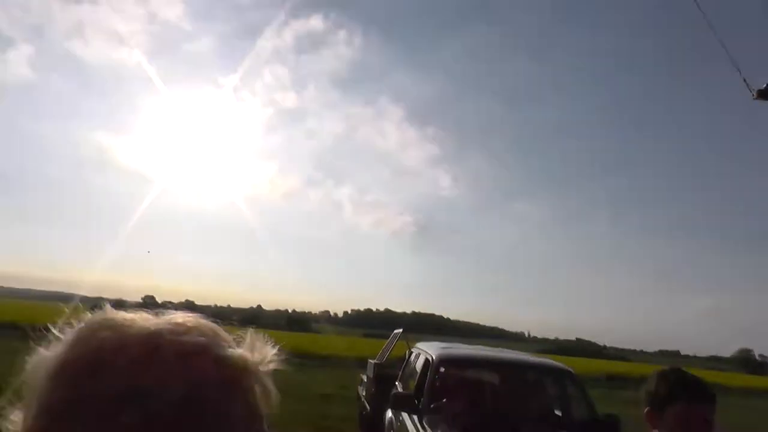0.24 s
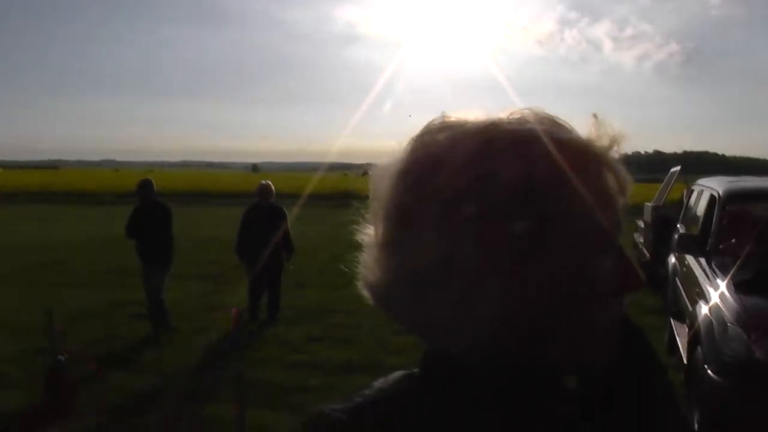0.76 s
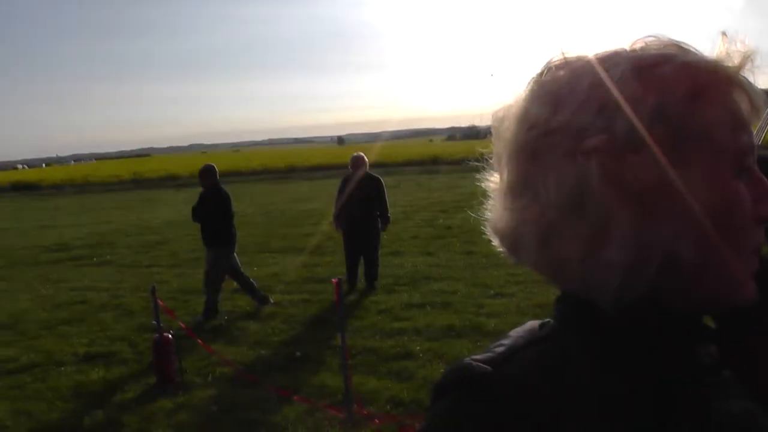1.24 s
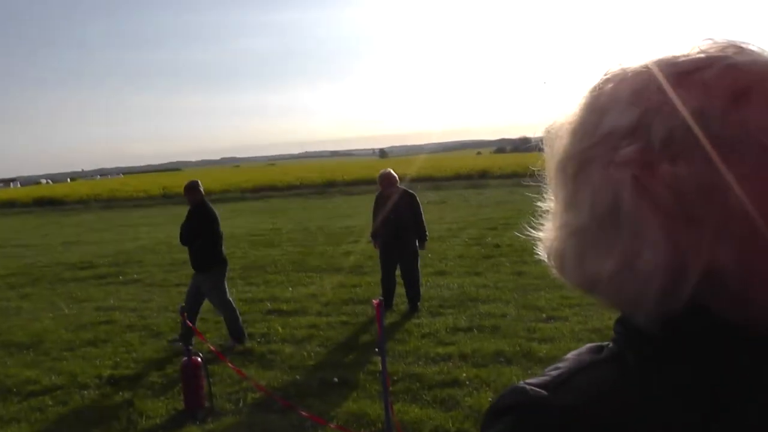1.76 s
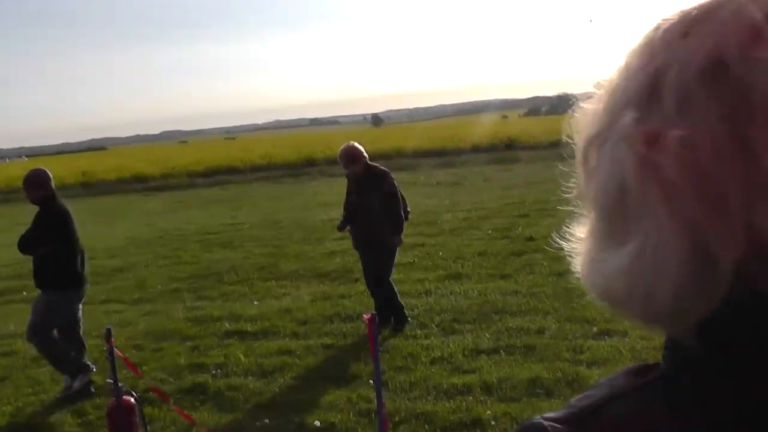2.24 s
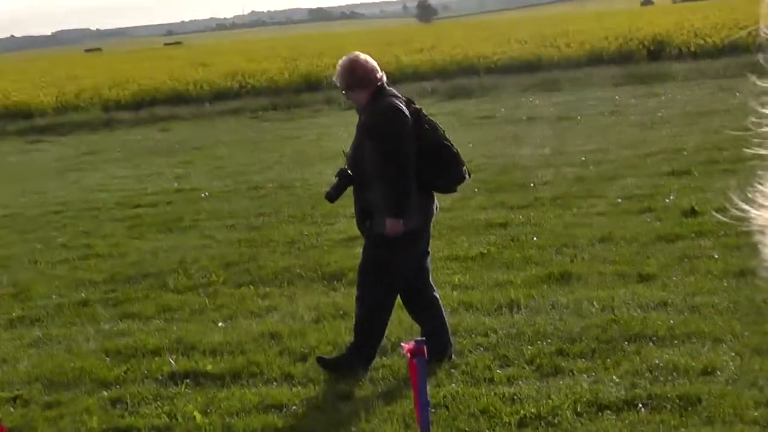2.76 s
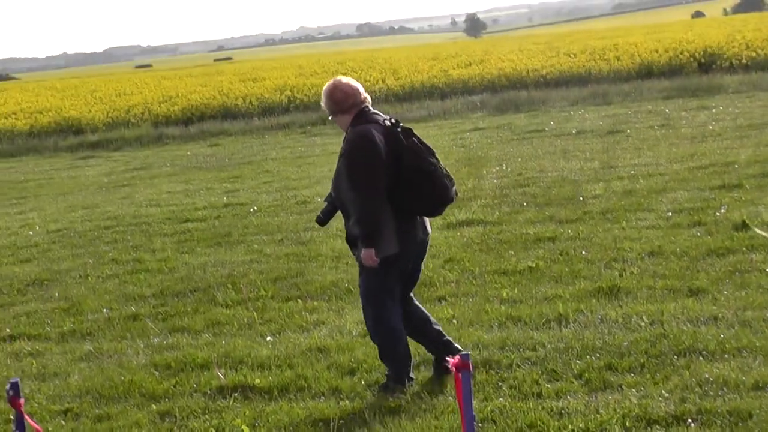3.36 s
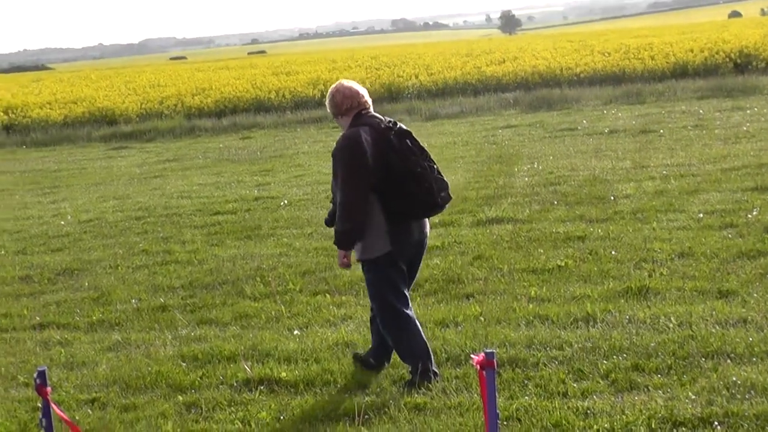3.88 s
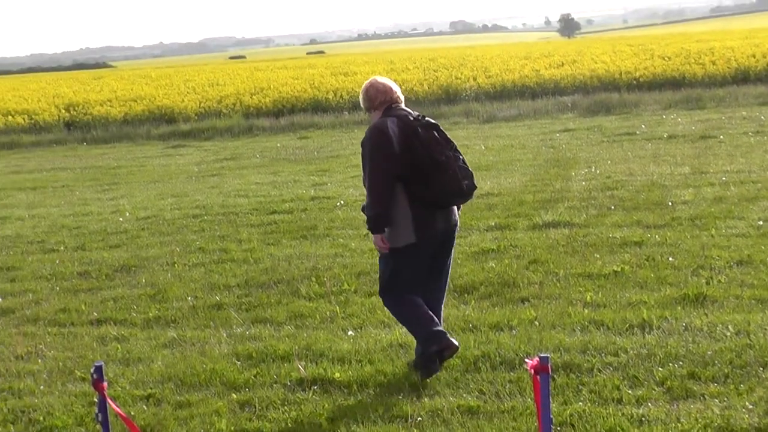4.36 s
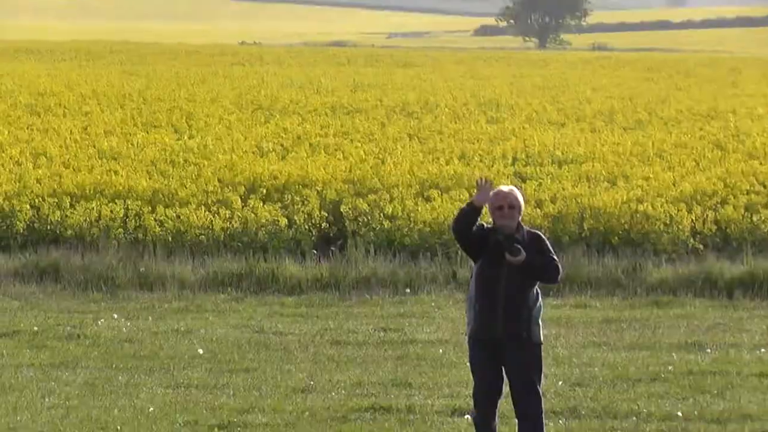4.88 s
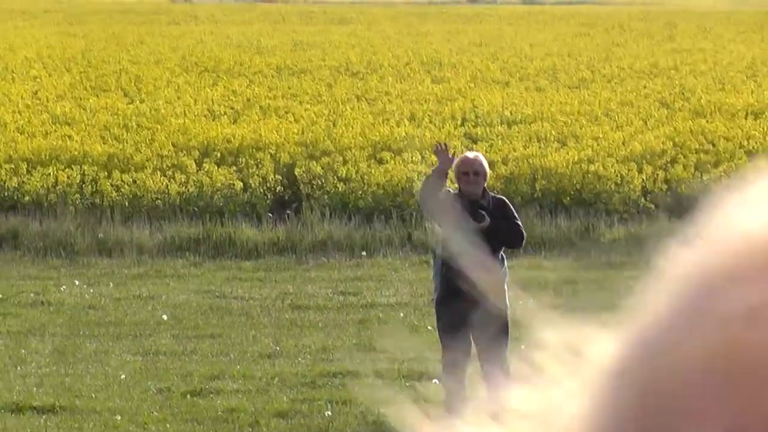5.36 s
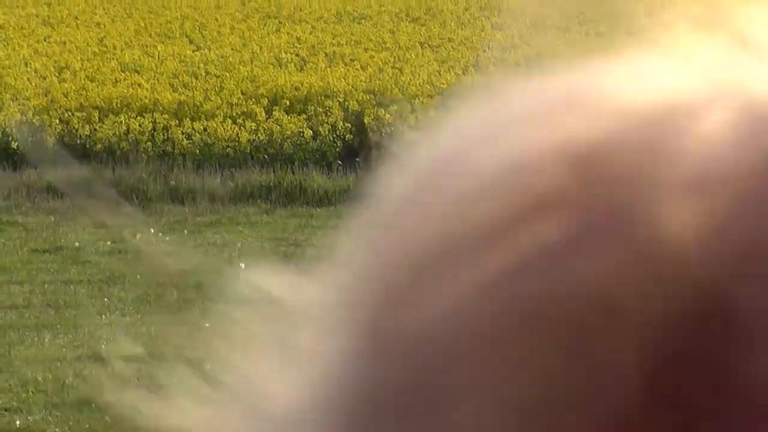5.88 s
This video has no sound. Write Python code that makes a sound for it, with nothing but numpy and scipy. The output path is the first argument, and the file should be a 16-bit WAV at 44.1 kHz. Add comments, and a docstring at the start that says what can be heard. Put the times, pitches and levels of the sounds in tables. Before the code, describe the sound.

A continuous loud burner flame, heard through close stereo microphones in the open air, fills nearly everything. Low turbulent roar and airy gas hiss pulse together, their colour shifting with short echoes as the microphones swing down past heads. After a split-second dip it sounds darker and rougher, weakens, then dies within a moment. Very quiet field rush follows, with a tiny click and a thin high tone.

```python
"""A hot-air balloon's burner roars in an open field, under the surging hiss of its propane jets.
Roar and hiss are shaped noise, coloured by short echoes that shift as the microphones swing down.
The level dips briefly, and the blast goes on as heard from a more shaded spot.
Then the valve shuts and the flame dies; a faint metal tone (a wavering sine) and a click (noise plus
ringing sines) can be heard over a soft rush of noise in the field."""
import sys
import numpy as np
from scipy import signal
from scipy.fft import rfft, irfft
from scipy.io import wavfile
from scipy.ndimage import uniform_filter1d

SR = 44100
rng = np.random.default_rng(int(sys.argv[2]) if len(sys.argv) > 2 else 0)


def waveform_to_disk(signal):
    """Save audio, clipped to [-1, 1], as 16-bit WAV at the path in sys.argv[1]."""
    frames = np.transpose(np.atleast_2d(signal))
    scaled = np.clip(frames, -1, 1) * 32767
    samples = np.round(scaled).astype(np.int16)
    wavfile.write(sys.argv[1], SR, samples)


N = 269441  # length in samples
FRAME, HOP = 2048, 512  # samples in one short-time spectrum, and from one to the next
TIME = np.arange(N) / SR
FRAME_TIME = np.arange(N // HOP + 5)[:, None] * HOP / SR
BIN_HZ = np.fft.rfftfreq(FRAME, 1 / SR)
TOP_HZ = 15800  # upper limit of the whole sound

# the valve shuts, with a rounded start to the fall
SHUT_S, CLOSING_S = 5.664, 0.021

# colour of the roar in the open and from the shaded spot; only the shape counts: f/Hz, level/dB per Hz
ROAR_OPEN_COLOUR = [(21, -56), (60, -20.5), (90, -5.5), (170, 0.5), (243, 0), (285, -5.5), (335, -2),
                    (385, -7.5), (450, -3.5), (580, -5.5), (720, -13), (880, -15), (1000, -17),
                    (1350, -28.5), (2400, -42)]
ROAR_SHADED_COLOUR = [(12, -76), (20, -44), (47, -26), (81, -16.5), (119, -7), (224, -3), (260, -4),
                      (320, -3), (384, -9), (520, -7), (684, -12.5), (808, -20.5), (1190, -27.5),
                      (1340, -31), (1560, -44), (2210, -62), (3740, -120)]
# size of the flame, before the short level changes and its dying away: t/s, level/dB
FLAME_SIZE = [(0, -15), (1.8, -14.5), (3.0, -14.5), (4.8, -14), (4.9, -14.5), (5.35, -14.5), (5.6, -16.5)]
# short rises and falls in the roar's level: t/s, level/dB (rise or fall)
ROAR_LEVEL_CHANGES = [(0.06, -1), (0.31, -0.8), (0.58, -1), (0.73, 1.5), (0.85, 2), (1.06, -1.3),
                      (1.71, 0.5), (1.89, -0.5), (2.5, 1.2), (2.8, -2.5), (3.23, 1), (3.98, 2),
                      (4.15, -2.5), (4.25, 1.5), (4.37, 1.7), (4.54, -3), (4.69, 2), (4.88, -3.3),
                      (4.98, -1.5), (5.1, -2)]
CHANGE_WIDTH_S = 0.022
# the roar's upper range grows and shrinks against its bass: t/s, tilt/dB per octave
ROAR_TILT = [(0, -0.5), (.6, -0.9), (1.1, -0.24), (3.5, 0.5), (4.8, -0.3), (5.6, -.7)]
# a narrow band of the roar stands out, then sinks, as its pitch shifts: t/s, f/Hz (centre), level/dB (lift)
NARROW_BAND = [(0.05, 726, 2), (.35, 730, 9.5), (.6, 730, 3), (.8, 840, 1), (1.3, 850, 1.5), (2.1, 830, -2),
               (2.35, 1040, 4), (2.9, 1030, 1.5), (3.5, 1076, 4), (4, 1070, -7)]
NARROW_WIDTH_HZ = 27
# a broader band below it stands out too, as its pitch shifts: t/s, f/Hz (centre), level/dB (lift)
BROAD_BAND = [(0, 406, 3), (.7, 445, 2.5), (1.2, 620, 3), (1.7, 630, 3), (2.2, 560, -1)]
BROAD_WIDTH_HZ = 53
# the roar's level also drifts a little at random
DRIFT_DB, DRIFT_HZ = 0.1, 5.2
# after the valve shuts the flame dies away, and loses its small eddies first
FLAME_FALL_DB_PER_S, DULLING_OCTAVES_PER_S = 190, 13


def roar(colour, sputter_db, sputter_hz, top_hz=2600):
    """Eddies of burning gas swell and collapse, too large to make treble; uneven mixing makes them sputter."""
    closed_s = since(FRAME_TIME, SHUT_S, CLOSING_S)
    edge_hz = top_hz * 2 ** (-DULLING_OCTAVES_PER_S * closed_s)
    roll_off_db = 10 * np.log10(1 + (BIN_HZ / edge_hz) ** 8)

    octaves = np.log2(np.clip(BIN_HZ, 100, 1500) / 300)  # the tilt turns around 300 Hz
    tilt_db = at(ROAR_TILT, FRAME_TIME) * octaves
    narrow_db = moving_band(NARROW_BAND, NARROW_WIDTH_HZ)
    broad_db = moving_band(BROAD_BAND, BROAD_WIDTH_HZ)
    colour_db = over_bins(colour) + tilt_db + narrow_db + broad_db + lumps() - roll_off_db
    eddies = turbulence(colour_db)

    changes_db = sum(rise_db * bump(TIME, s, CHANGE_WIDTH_S) for s, rise_db in ROAR_LEVEL_CHANGES)
    dying_db = FLAME_FALL_DB_PER_S * since(TIME, SHUT_S, CLOSING_S)
    size_db = at(FLAME_SIZE, TIME) + changes_db - dying_db
    drift_db = DRIFT_DB * wander(DRIFT_HZ)
    return eddies * gain_of(size_db + drift_db + sputter_db * wander(sputter_hz))


def moving_band(rows, width_hz):
    """A band of shifting pitch stands out of the roar, or sinks into it where the lift is negative."""
    lift_db = at(rows, FRAME_TIME, column=2)
    return lift_db * bump(BIN_HZ, at(rows, FRAME_TIME), width_hz)


def lumps(lump_db=1.0, below_hz=700):
    """Large eddies come and go, each lifting its own patch of the low roar."""
    field = rng.standard_normal((len(FRAME_TIME), len(BIN_HZ)))
    field = uniform_filter1d(field, size=9, axis=0)  # each patch lasts a few frames
    field = uniform_filter1d(field, size=6, axis=1)  # and covers a few bins
    return lump_db * evened(field) / (1 + (BIN_HZ / below_hz) ** 4)


# colour of the hiss in the open and from the shaded spot; only the shape counts: f/Hz, level/dB per Hz
HISS_OPEN_COLOUR = [(1000, -0.5), (1600, -3.5), (2100, -3), (2700, -5), (3400, -7), (4200, -6), (4700, -8),
                    (5300, -6), (5900, -2.5), (6900, -2.5), (7900, -6.5), (11300, -5.5), (13000, -10.5),
                    (15700, -19.5)]
HISS_SHADED_COLOUR = [(850, -25), (1450, -2.5), (2080, -5.5), (2560, -11), (3600, -13), (4350, -15.5),
                      (5100, -11), (5870, -9), (6960, -9), (7850, -16), (9680, -9.5), (11200, -8.3),
                      (15000, -19), (15800, -24)]
# the jets surge unevenly, about three times a second: t/s (crest), level/dB (rise)
JET_SURGES = [(.06, 4.5), (.36, 3.5), (.66, 3), (1.07, 4.5), (1.39, 3), (1.73, 3.5), (2.14, 3.5), (2.44, 3),
              (2.84, 4.0), (3.18, 4), (3.52, 4), (3.85, 3.5), (4.25, 3), (4.6, 3)]
SURGE_WIDTH_S = 0.13
# the gas pressure also trembles at random
UNREST_DB, UNREST_HZ = 0.68, 17
# the hiss is strongest at about 4 s and a little weaker on either side
STRONGEST_S, WEAKENING_DB_PER_S = 4.1, 0.26
# the valve is eased back: the hiss sinks and its top softens (softening as it is at TOP_HZ)
EASE_S, EASE_DB_PER_S, SOFTEN_DB_PER_S = 5.17, 8.5, 26.5
# once the valve shuts, the hiss falls this much faster still
HISS_FALL_DB_PER_S = 172
# the top of the hiss is brighter while the microphones still point up: lift, lower edge, how long
UPWARD_DB, UPWARD_HZ, UPWARD_S = 2, 9800, 1
# the hiss has a sharper edge for a while beside a head: centre, width, lift, time, half-length
SHEEN_HZ, SHEEN_WIDTH_HZ, SHEEN_DB, SHEEN_S, SHEEN_LENGTH_S = 5800, 620, 2.5, 1.5, 0.87


def hiss(colour, level_db, flutter_db, flutter_hz):
    """Propane tears out of the nozzles, fluttering quickly on top of its slow surges."""
    upper_range = BIN_HZ ** 8 / (BIN_HZ ** 8 + UPWARD_HZ ** 8)
    lift_db = UPWARD_DB * bump(FRAME_TIME, 0, UPWARD_S) * upper_range
    sheen_now_db = SHEEN_DB * bump(FRAME_TIME, SHEEN_S, SHEEN_LENGTH_S)
    sheen_db = sheen_now_db * bump(BIN_HZ, SHEEN_HZ, SHEEN_WIDTH_HZ)
    eased_s = since(FRAME_TIME, EASE_S, CLOSING_S)
    softening_db = SOFTEN_DB_PER_S * eased_s * (BIN_HZ / TOP_HZ) ** 2
    jets = turbulence(over_bins(colour) + lift_db + sheen_db - softening_db + scatter())

    surges_db = sum(rise_db * bump(TIME, s, SURGE_WIDTH_S) for s, rise_db in JET_SURGES)
    weakening_db = WEAKENING_DB_PER_S * abs(TIME - STRONGEST_S)
    easing_db = EASE_DB_PER_S * since(TIME, EASE_S, CLOSING_S)
    shutting_db = HISS_FALL_DB_PER_S * since(TIME, SHUT_S, CLOSING_S)
    flow_db = level_db + surges_db - weakening_db - easing_db - shutting_db
    unrest_db = UNREST_DB * wander(UNREST_HZ)
    return jets * gain_of(flow_db + unrest_db + flutter_db * wander(flutter_hz))


def scatter(ripple_db=1.8, above_hz=1500, below_hz=11000):
    """Many weak reflections off people and gear leave a fine, still ripple in the treble."""
    returned = BIN_HZ / (BIN_HZ + above_hz) / (1 + (BIN_HZ / below_hz) ** 4)
    ripple = uniform_filter1d(rng.standard_normal(len(BIN_HZ)), size=5)
    return ripple_db * returned * evened(ripple)


# how the burner reaches the two microphones:
# f/Hz, likeness (0-1), lead of the left/radians, left minus right/dB
BURNER_STEREO = [(30, 0.88, 0, -0.3), (70, 0.992, -0.08, -0.3), (220, 0.996, -0.22, 0.1),
                 (400, 0.988, -0.36, -3), (480, 0.992, -0.25, -3), (620, 0.99, -0.3, -1.4),
                 (780, 0.95, -0.45, -6), (1050, 0.96, -0.33, -2.3), (1400, 0.8, -0.5, -4.5),
                 (1900, 0.55, -0.2, -6.5), (2500, 0.62, -0.2, -3.3), (3300, 0.5, -0.3, -3.3),
                 (4000, 0.2, -0.3, -0.8), (6400, 0.55, -0.15, -0.1), (8200, 0.15, -0.8, 0.6),
                 (9500, 0.25, -3, 0.6), (14000, 0.11, 0, -4.3)]


def turbulence(colour_db):
    """Noise of a given colour from the burner, shaded and echoed by what stands near."""
    return steady_noise(microphones(BURNER_STEREO) * surroundings() * gain_of(colour_db))


# as the microphones swing past a head, a broad hollow moves through the left side:
# t/s, f/Hz (centre), level/dB (loss)
HEAD_SHADE = [(0, 1350, 8), (.2, 1500, 1), (.4, 3000, 1.5), (.86, 2970, 1.5), (1.2, 3300, 1),
              (3.6, 3320, 0.5)]
# a short echo off a bystander's head; its delay shortens as the microphones come down, and on the
# shaded left side it can outweigh the direct sound:
# t/s, delay/ms (left), strength left, strength right (direct sound = 1)
HEAD_ECHO = [(0, 1.33, 2, .15), (.15, 1.26, 2, .2), (.37, 1.07, 1.6, .45), (.7, .92, 1.1, .65),
             (1.05, .87, .6, .3), (1.6, .85, .2, .1), (2.2, .8, 0, 0), (4.82, .89, 0, 0),
             (4.87, .89, 1.4, .5)]
# a second echo, off a surface a little farther away: t/s, delay/ms, strength (direct sound = 1)
SURFACE_ECHO = [(0, 2.75, .25), (.3, 2.7, .45), (.55, 2.66, .35), (.8, 2.36, .3), (2.1, 2.3, .17),
                (2.4, 1.9, .17), (4.8, 1.88, .2), (4.9, 1.88, 0)]


def surroundings(shade_octaves=1.0, right_later_ms=0.11):
    """What the echoes and the head's shadow do to the burner's sound at each microphone."""
    octaves, centre = np.log2(BIN_HZ + 1), np.log2(at(HEAD_SHADE, FRAME_TIME))
    shade_db = at(HEAD_SHADE, FRAME_TIME, column=2) * bump(octaves, centre, shade_octaves)
    head_ms = at(HEAD_ECHO, FRAME_TIME)
    left_strength = at(HEAD_ECHO, FRAME_TIME, column=2)
    right_strength = at(HEAD_ECHO, FRAME_TIME, column=3)
    left = echoed(head_ms, left_strength, low_hz=1120, high_hz=3500) * gain_of(-shade_db)
    right = echoed(head_ms + right_later_ms, right_strength, low_hz=1020, high_hz=3260)
    surface_ms = at(SURFACE_ECHO, FRAME_TIME)
    surface_strength = at(SURFACE_ECHO, FRAME_TIME, column=2)
    surface = echoed(surface_ms, surface_strength, low_hz=300, high_hz=1260)
    return np.array([left, right]) * surface


def echoed(delay_ms, strength, low_hz, high_hz):
    """Direct sound plus an echo at equal power: bass bends round a small surface, treble sinks into a soft one."""
    bass_kept = BIN_HZ ** 4 / (BIN_HZ ** 4 + low_hz ** 4)
    treble_kept = 1 / (1 + (BIN_HZ / high_hz) ** 4)
    returned = strength * bass_kept * treble_kept
    later = np.exp(-2j * np.pi * BIN_HZ * delay_ms / 1000)
    return (1 + returned * later) / np.sqrt(1 + returned ** 2)


# burner metal rings on after the blast: pitch, level at the right, time of its peak, half-length
RING_HZ, RING_DB, RING_S, RING_WIDTH_S = 1850, -66.5, 5.98, 0.35


def ring(waver_hz=2, shimmer_db=0.5, left_db=-7.0):
    """One thin tone of the burner's metal, a little to the right, uncovered when the flame stops."""
    turns = np.cumsum(RING_HZ + waver_hz * wander(30)) / SR
    tone = evened(np.sin(2 * np.pi * turns)) * bump(TIME, RING_S, RING_WIDTH_S)
    tone = tone * gain_of(RING_DB + shimmer_db * wander(25))
    return np.array([gain_of(left_db) * tone, tone])


# a small click and its duller rebound: t/s, level/dB (crack, before its band filter), level/dB (ring)
CLICK_TAPS = [(5.848, -49, -45), (5.849, -49, -50)]
# what the click rings with: f/Hz, level/dB (relative to the ring), time to fall by 60 dB/s
CLICK_TONES = [(6550, -4, .009), (7000, -8, .006), (9900, -13, .006)]


def clicks(crack_t60=.016):
    """Each tap is a short crack that rings a few modes of a small hard part."""
    out = np.zeros(N)
    band = signal.butter(2, [1200, 6000], "band", fs=SR, output="sos")
    for s, crack_db, ring_db in CLICK_TAPS:
        t = TIME[TIME >= s] - s
        crack = signal.sosfilt(band, rng.standard_normal(len(t)))
        crack = crack * gain_of(crack_db - 60 * t / crack_t60)
        modes = sum(gain_of(db - 60 * t / t60) * np.sin(2 * np.pi * hz * t) for hz, db, t60 in CLICK_TONES)
        out[N - len(t):] += gain_of(ring_db) * modes + crack
    return out


# colour of a soft background rush in the field; only the shape counts: f/Hz, level/dB per Hz
RUSH_COLOUR = [(18, -46), (40, -14), (136, 0), (234, 0), (460, -8), (815, -9), (1410, -21), (1800, -19),
               (2190, -25), (3900, -28), (4700, -33), (5300, -28), (6800, -30), (7900, -39), (9000, -32.5),
               (11500, -34), (15000, -47)]
RUSH_DB = -53
# the background reaches both microphones nearly alike, except in the treble:
# f/Hz, likeness (0-1), lead of the left/radians, left minus right/dB
BACKGROUND_STEREO = [(200, .99, 0, .3), (1100, .96, 0, .4), (1450, .85, 0, .5), (3400, .94, 0, -.5),
                     (5500, .6, 0, -1), (9000, .2, 0, 0)]
# the background swells a little after the blast: start, rise time, level, band
SWELL_S, SWELL_RISE_S, SWELL_DB, SWELL_LOW_HZ, SWELL_TOP_HZ = 6.042, 0.028, -47.5, 396, 1700


def background():
    """A soft rush straight ahead, uncovered when the flame stops; it swells more in the body than at the top."""
    rush = steady_noise(microphones(BACKGROUND_STEREO) * gain_of(over_bins(RUSH_COLOUR)))
    outside_band = (BIN_HZ / SWELL_TOP_HZ) ** 2 + (SWELL_LOW_HZ / (BIN_HZ + 1)) ** 2
    swell_colour_db = over_bins(RUSH_COLOUR) - 10 * np.log10(1 + outside_band)
    swell = steady_noise(microphones(BACKGROUND_STEREO) * gain_of(swell_colour_db))
    rise = np.clip((TIME - SWELL_S) / SWELL_RISE_S, 0, 1)
    return gain_of(RUSH_DB) * rush + gain_of(SWELL_DB) * rise * swell


def microphones(stereo):
    """Random short-time spectra for two close microphones, as alike at each pitch as the table says."""
    a, b, c, d = rng.standard_normal((4, len(FRAME_TIME), len(BIN_HZ)))
    same = np.clip(over_bins(stereo), 0, 1)
    lead = np.exp(1j * over_bins(stereo, column=2))
    lean = gain_of(over_bins(stereo, column=3)) * lead
    left = a + 1j * b
    right = same * left + np.sqrt(1 - same ** 2) * (c + 1j * d)
    # keeps the power of the two added together the same at every pitch
    return np.array([left * lean, right]) / np.sqrt(abs(lean) ** 2 + 1 + 2 * same * lean.real)


def steady_noise(pair):
    """Turns short-time spectra into sound held at a steady level."""
    x = signal.istft(pair.swapaxes(1, 2), nperseg=FRAME, noverlap=FRAME - HOP)[1][:, :N]
    return x / np.sqrt(uniform_filter1d(x.mean(0) ** 2, size=4000))


def wander(rate_hz):
    """Smooth random movement of rms 1, mostly slower than the rate."""
    hz = np.fft.rfftfreq(N, 1 / SR)
    slow = rfft(rng.standard_normal(N)) * np.exp(-(hz / rate_hz) ** 2)
    return evened(irfft(slow, N))


def since(t, start_s, knee_s):
    """Seconds gone by since a start, with a rounded knee."""
    return knee_s * np.logaddexp(0, (t - start_s) / knee_s)


def bump(x, centre, width):
    """A smooth rise to 1 and fall back to 0."""
    return np.exp(-((x - centre) / width) ** 2)


def at(rows, t, column=1):
    """Reads one column of a curve at the times t."""
    rows = np.array(rows)
    return np.interp(t, rows[:, 0], rows[:, column])


def over_bins(rows, column=1):
    """Reads one column of a spectrum on a log-frequency axis."""
    rows = np.array(rows)
    return np.interp(np.log(BIN_HZ + 1), np.log(rows[:, 0] + 1), rows[:, column])


def gain_of(db):
    """Decibels to amplitude."""
    return 10 ** (np.asarray(db) / 20)


def evened(x):
    """Scales to rms 1."""
    return x / np.sqrt(np.mean(x ** 2) + 1e-20)


# the level dips briefly as the listening spot changes: start t/s, end t/s
DIP = (4.8507, 4.856)


def scene():
    """The blast from the open spot, then its end from the shaded one."""
    in_open = (roar(ROAR_OPEN_COLOUR, sputter_db=0.45, sputter_hz=67.0)
               + hiss(HISS_OPEN_COLOUR, level_db=-36.0, flutter_db=0.3, flutter_hz=150))
    shaded = (roar(ROAR_SHADED_COLOUR, sputter_db=1.46, sputter_hz=70)
              + hiss(HISS_SHADED_COLOUR, level_db=-41.0, flutter_db=0.4, flutter_hz=110))
    burner = np.where(TIME < DIP[0], in_open, shaded + ring())
    return burner + background() + clicks()


def record(dry, dip_db=-18):
    """The level dips for an instant between the two spots; then a low-pass filter removes the extreme treble."""
    dipped = uniform_filter1d(1. * (TIME >= DIP[0]) * (TIME < DIP[1]), size=30)
    low_pass = signal.firwin(1023, TOP_HZ, window=("kaiser", 9), fs=SR)
    return signal.oaconvolve(dry * gain_of(dip_db * dipped), low_pass[None], "same")


dry = scene()
out = record(dry)
waveform_to_disk(out)
```